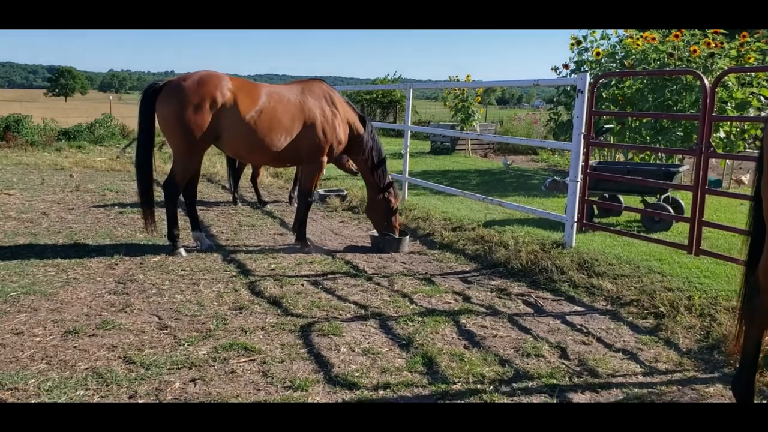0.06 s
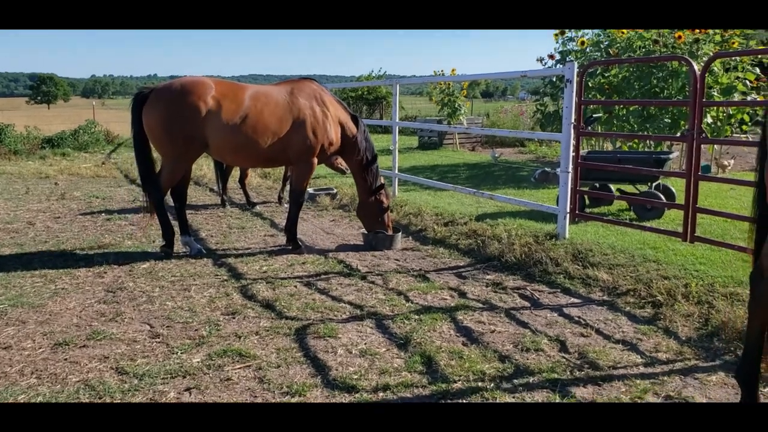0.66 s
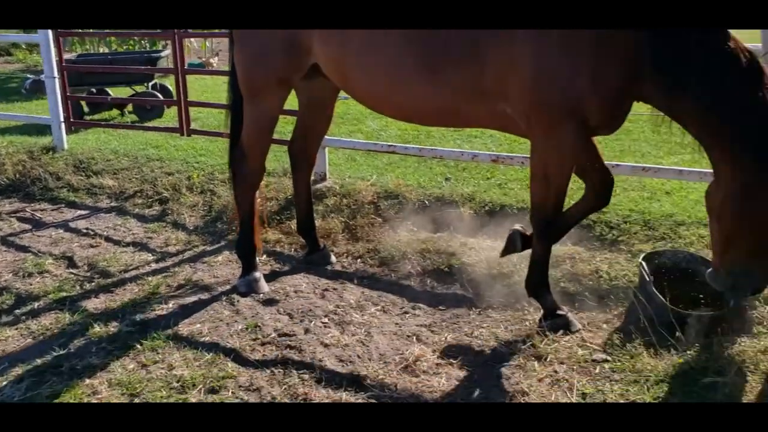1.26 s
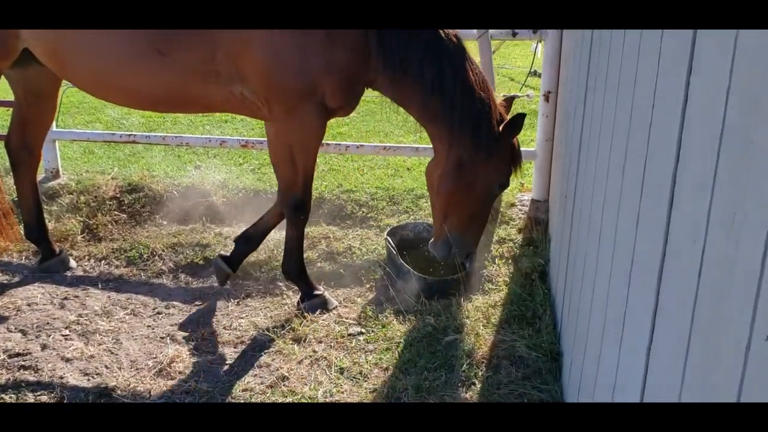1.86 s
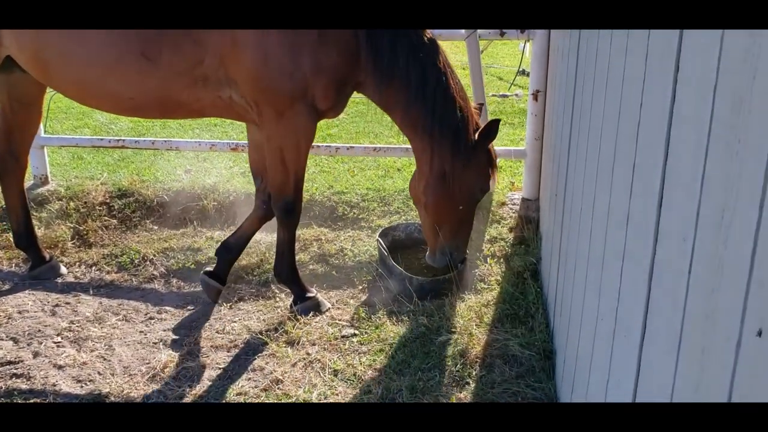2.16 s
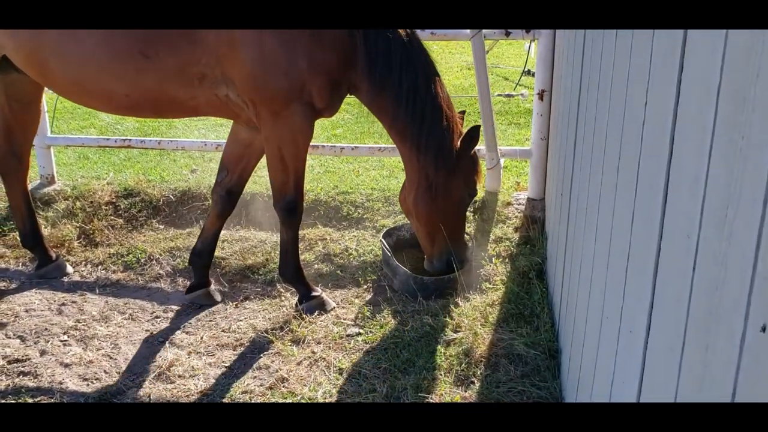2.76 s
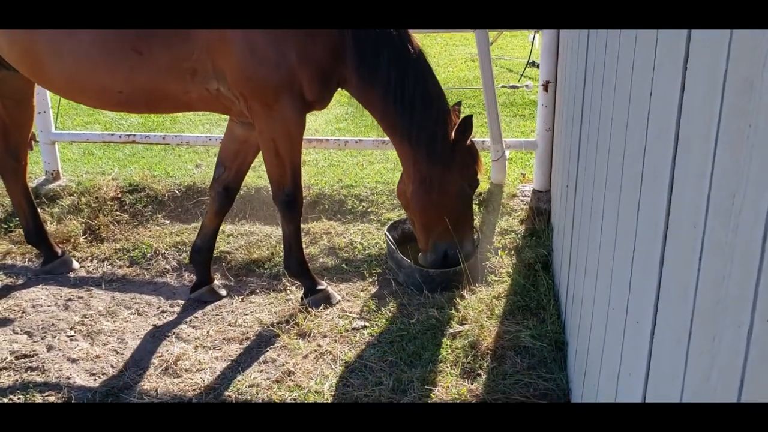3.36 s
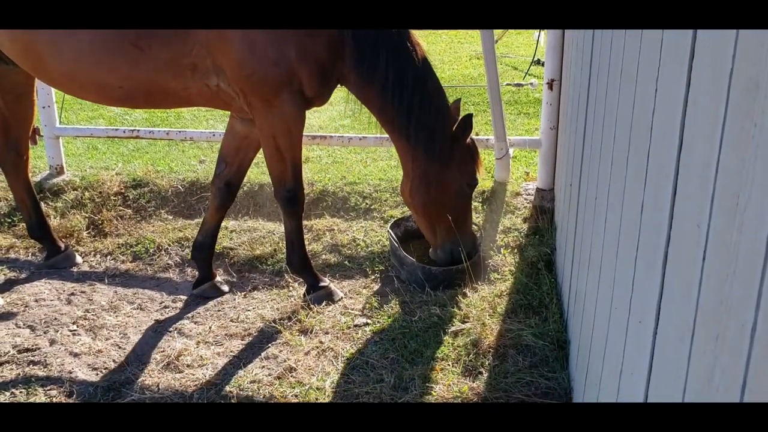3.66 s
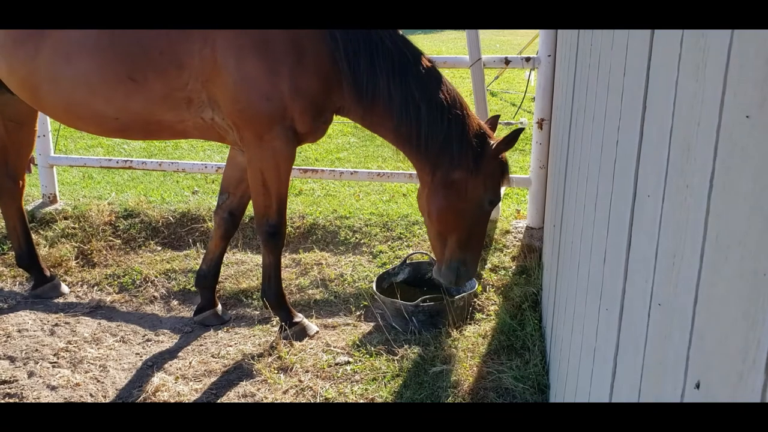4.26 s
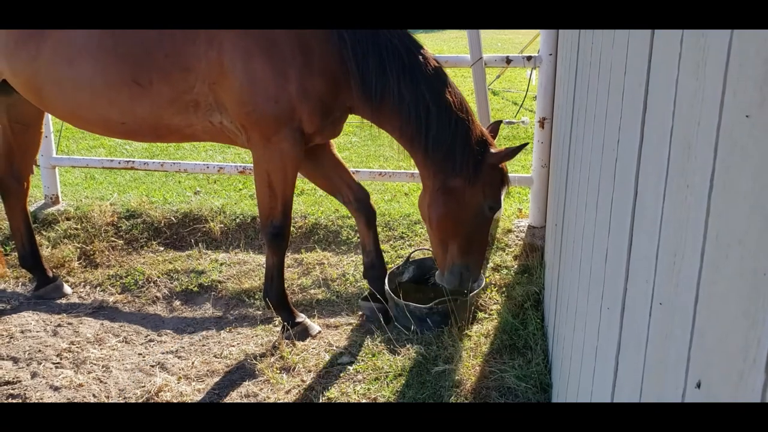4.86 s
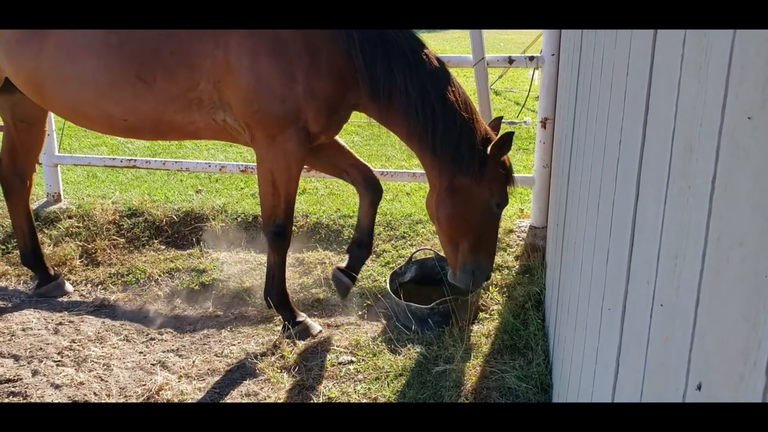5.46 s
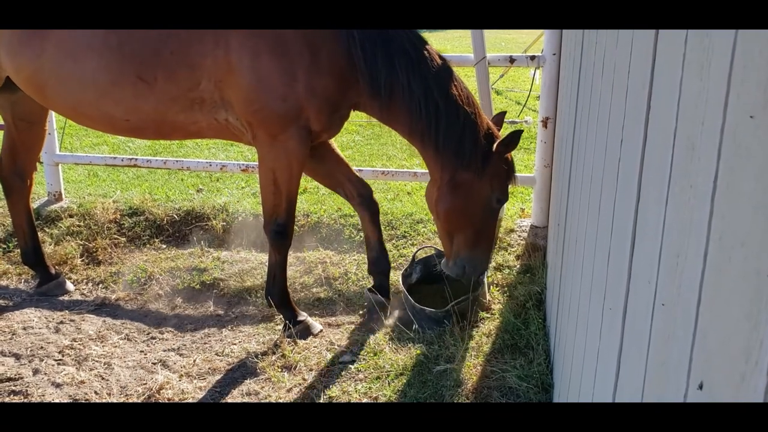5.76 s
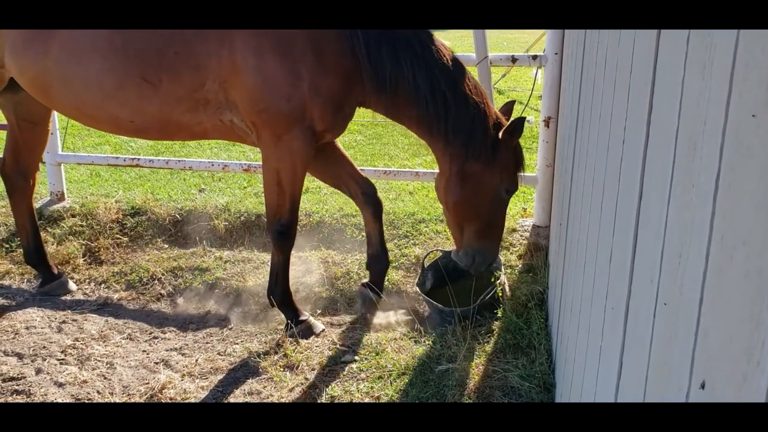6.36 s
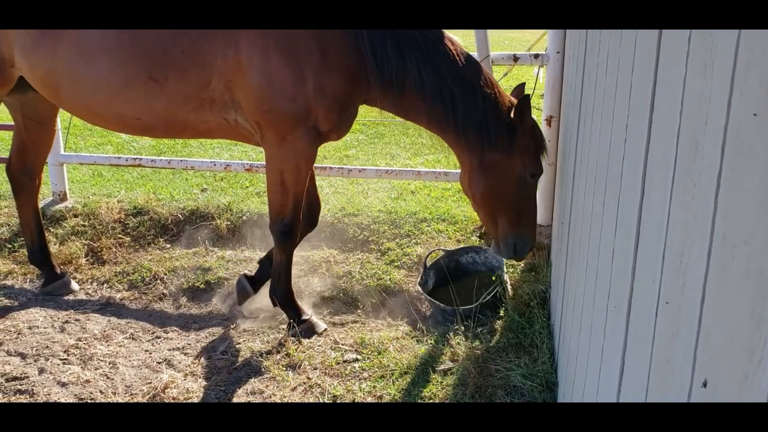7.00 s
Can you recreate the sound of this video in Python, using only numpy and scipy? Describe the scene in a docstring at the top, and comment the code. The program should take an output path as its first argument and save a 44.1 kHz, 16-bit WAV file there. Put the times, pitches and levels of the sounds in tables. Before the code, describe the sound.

Hollow hoof knocks on a rubber tub, dry dirt scrapes and soft thuds as a horse feeds, with one falling chicken squawk.

```python
"""Hollow knocks, cracks and dry scrapes: a horse paws at the low rubber tub it feeds from in a farmyard.
Each hoof blow rings the tub's damped modes; grit snaps and dirt drags in showers of tiny collisions,
and the muzzle bumps about in the feed. A chicken gives one long falling squawk that turns raspy as
its period doubles; another calls far off. Insects sizzle in the grass, something hums, and light wind
rumbles on the microphone. The level dips briefly just before the squawk."""
import sys
import numpy as np
from scipy import signal
from scipy.fft import rfft, irfft, next_fast_len
from scipy.io import wavfile

SR = 44100
rng = np.random.default_rng(int(sys.argv[2]) if len(sys.argv) > 2 else 0)


def digitize_waveform(pressure):
    """Quantize a signal to 16-bit integers and store it at the path in sys.argv[1].

    Rows of a 2-D input are taken as channels; values are limited to [-1, 1].
    """
    field = np.atleast_2d(pressure).T
    bounded = np.clip(field, -1, 1)
    quanta = np.round(bounded * 32767).astype(np.int16)
    wavfile.write(sys.argv[1], SR, quanta)


N = 310023
TIME = np.arange(N) / SR


def from_db(db):
    """Amplitude ratio of a level in decibels."""
    return 10 ** (np.asarray(db) / 20)


def rms_one(x):
    """Normalisation to rms 1."""
    return x / np.sqrt(np.mean(x ** 2) + 1e-20)


def in_time(rows):
    """Linear interpolation of a curve's columns at every sample."""
    times_s, *columns = np.transpose(rows)
    return [np.interp(TIME, times_s, column) for column in columns]


def during(rows, fade_s=0.00595):
    """A gate: 1 while a curve runs, fading to 0 outside it."""
    return np.clip(1 + np.minimum(TIME - rows[0][0], rows[-1][0] - TIME) / fade_s, 0, 1)


def add(track, start_s, sound):
    """Superposition of a sound on a track."""
    start = round(start_s * SR)
    track[..., start:start + sound.shape[-1]] += sound[..., :N - start]


def panned(db):
    """Left and right gains for an interaural level difference."""
    return from_db(db * np.array([[.5], [-.5]]))


def drift(per_s):
    """Random modulation: straight lines between Gaussian values, rms 1."""
    knots = rng.standard_normal(int(N / SR * per_s) + 2)
    return rms_one(np.interp(TIME * per_s, np.arange(len(knots)), knots))


def noise(spectrum, coherence):
    """Spectrally shaped stereo noise with a given left-right coherence, rms 1."""
    hz, db = np.transpose(spectrum)
    size = next_fast_len(N)
    log_hz = np.log(np.arange(size // 2 + 1) * SR / size + 1)
    gain = from_db(np.interp(log_hz, np.log(hz), db, left=-120, right=-120))
    mid, side = irfft(rfft(rng.standard_normal((2, size))) * gain, size)[:, :N]
    return rms_one(np.sqrt(1 + coherence) * mid + np.sqrt(1 - coherence) * side * [[1], [-1]])


def band(hz, half_width_hz, coherence):
    """Noise in a single resonance, 25 dB down at its edges."""
    return noise([(hz - half_width_hz, -25), (hz, 0), (hz + half_width_hz, -25)], coherence)


def decay(t60):
    """A quarter second of exponential damping, 60 dB in t60 seconds."""
    return np.exp(-np.log(1000) * TIME[:SR // 4] / t60)


def swell(t60, contact_s):
    """Impact envelope of height 1: vibration grows during contact, then decays."""
    shape = (1 - np.exp(-(TIME[:SR // 4] / contact_s) ** 2)) * decay(t60)
    return shape / shape.max()


def ring(hz, t60, contact_s, phase_rad=0):
    """One struck mode: a damped sinusoid."""
    return swell(t60, contact_s) * np.sin(2 * np.pi * hz * TIME[:SR // 4] + phase_rad)


def surge(peak_s, rise_s, fade_s):
    """Gaussian rise to height 1, then exponential decay; 20 dB in each span."""
    decades = np.where(TIME < peak_s, ((peak_s - TIME) / rise_s) ** 2, (TIME - peak_s) / fade_s)
    return 10 ** -np.minimum(decades, 10)


def grains(per_s, spread_db, t60):
    """Shot-noise envelope, rms 1: the energies of tiny random collisions add and decay."""
    hits = rng.random(N) < per_s / SR
    power = hits * from_db(spread_db * np.minimum(rng.exponential(1, N), 5)) ** 2
    retained = from_db(-120 / (t60 * SR))
    return rms_one(np.sqrt(signal.lfilter([1], [1, -retained], power + 1e-18)))


def crumbling(spectrum, split_hz, per_s, spread_db, t60, coherence):
    """Granular noise: coarse and fine grains collide independently, below and above a split."""
    whole = noise(spectrum, coherence)
    coarse = signal.sosfiltfilt(signal.butter(2, split_hz, fs=SR, output="sos"), whole)
    return coarse * grains(per_s, spread_db, t60) + (whole - coarse) * grains(per_s, spread_db, t60)


# strength of the wind: time_s, level_db
WIND_LEVEL = [(0, -39), (.25, -46.5), (.95, -47), (1.15, -37), (1.6, -46.5), (2.3, -50.5), (3.1, -54.5),
              (4.4, -59.5), (4.62, -40), (5.05, -42.5), (5.55, -49.5), (6.25, -45.5), (6.6, -52.5),
              (7.03, -49.5)]
# its rumble: frequency_hz, level_db
WIND_SPECTRUM = [(15, -33.5), (25, -19.5), (38, -5.5), (56, 1.5), (80, -1.5), (125, -5), (165, -13.5),
                 (230, -37.5)]

def wind(gust_db=3, gusts_per_s=14):
    """Turbulence buffets the microphone ports, almost independently on each side."""
    rumble = noise(WIND_SPECTRUM, coherence=-.05)
    return from_db(in_time(WIND_LEVEL)[0] + gust_db * drift(gusts_per_s)) * rumble


# strength of the still air's hiss: time_s, level_db
AIR_LEVEL = [(0, -66.5), (2.8, -68), (4.2, -68.5), (4.3, -63), (5.5, -64), (7.03, -70)]
# its colour: frequency_hz, level_db
AIR_SPECTRUM = [(290, -37), (500, -6), (698, -3), (1000, -11.5), (1340, -11), (1510, -17), (2130, -18.5),
                (2330, -19), (2730, -19.5), (8090, -28.5), (10100, -7), (11800, -17), (16000, -12)]

def still_air():
    """Diffuse ambient noise, nearly incoherent between the ears."""
    return from_db(in_time(AIR_LEVEL)[0]) * noise(AIR_SPECTRUM, coherence=0.0993)


def hum(level_db=-62.5, pitch_hz=237):
    """Narrowband noise, heard as a low, wavering tone."""
    return from_db(level_db) * band(pitch_hz, half_width_hz=6, coherence=0.97)


# insects in the grass: pitch_hz, chirps_per_s, level_db
INSECT_BUZZES = [(9600, 3.3, -71.5), (10350, 8.3, -68.5), (10850, 5, -75)]

def insects(pace_spread=0.18):
    """Amplitude modulation: each of three insects pulses a high band of noise at its own pace."""
    out = 0
    for hz, chirps_per_s, db in INSECT_BUZZES:
        cycles = rng.random() + np.cumsum(chirps_per_s * (1 + pace_spread * drift(2.7))) / SR
        chirps = np.sin(np.pi * cycles) ** 16
        out = out + from_db(db) * chirps * band(hz, half_width_hz=500, coherence=0.42)
    return out


def voice(pitch_hz, partials, jitter, flutter_db, throat_hz, throat_width_hz, throat_db, lag_s):
    """Source and filter: a jittering syrinx drives a throat resonance; the right ear hears it later."""
    voiced = pitch_hz > 0
    hz = (pitch_hz * (1 + jitter * drift(350)))[voiced]
    cycles = np.cumsum(hz) / SR - np.array([[0], [lag_s]]) * hz
    out = np.zeros((2, N))
    for multiple, gain in partials:
        detuning = (multiple * hz - throat_hz) * 2 / throat_width_hz
        db = throat_db / (1 + detuning ** 2) + flutter_db * drift(120)[voiced]
        out[:, voiced] += np.sqrt(2) * gain[voiced] * from_db(db) * np.sin(2 * np.pi * multiple * cycles)
    return out


# course of the far chicken's call: time_s, pitch_hz, level_db
FAR_CONTOUR = [(6.71, 539, -91), (6.745, 539.5, -70.5), (6.86, 595, -81), (6.92, 630, -66),
               (7.03, 614, -69)]
# its harmonics: pitch_multiple, level_db
FAR_PARTIALS = [(1, 4.5), (2, -4), (3, -20), (4, -17)]

def far_chicken():
    """Strong pitch jitter makes a distant chicken's call hoarse."""
    pitch_hz, db = in_time(FAR_CONTOUR)
    level = from_db(db) * during(FAR_CONTOUR)
    partials = [(multiple, from_db(partial_db) * level) for multiple, partial_db in FAR_PARTIALS]
    return voice(pitch_hz * (level > 0), partials, jitter=0.04, flutter_db=2.5,
                 throat_hz=1080, throat_width_hz=150, throat_db=14, lag_s=.0001)


# faint calls across the yard: peak_s, length_s, pitch_hz, half_width_hz, level_db
FAINT_CALLS = [(2.014, 0.05, 796, 520, -54.5), (2.65, .37, 764, 402, -69.5), (3.351, 0.091, 2830, 900, -78),
               (3.496, .18, 2140, 300, -75), (6.015, .32, 1157, 499, -64)]

def far_animals():
    """Blurred animal calls: bands of noise under Gaussian envelopes."""
    out = 0
    for peak_s, length_s, hz, half_width_hz, db in FAINT_CALLS:
        envelope = np.exp(-(2 * (TIME - peak_s) / length_s) ** 2)
        out = out + from_db(db) * envelope * band(hz, half_width_hz, coherence=0.73)
    return out


# harmonics of the clear squawk: pitch_multiple, level_db
CLEAR_PARTIALS = [(1, -11), (2, -1), (3, -7), (4, -17), (5, -28), (8, -31.5), (9, -21), (10, -30),
                  (11, -22), (13, -29), (15, -25), (16, -25), (17, -28)]
# the same voice with its period doubled: pitch_multiple, level_db
RASPY_PARTIALS = [(1, -17), (1.5, -11), (2, -0.5), (2.5, -18), (3, -2.5), (3.5, -1.5), (4, 5),
                  (10.5, -21.5), (11, -13)]

def squawk(start_s=4.26, end_s=5.5, attack_s=0.026, release_s=.1, rasp_at_s=5.01, rasp_onset_s=0.12):
    """Period doubling: as a chicken's breath runs out, pitch and level sink and the voice rasps."""
    start_hz, start_db = 812.6, -44.5
    sag_hz, sag_db, waver_hz, waver_db = 169.1, 17, 4, 3   # reached after one second
    age_s = np.maximum(TIME - start_s, 0)
    spent, fatigue = age_s ** 1.55, np.sqrt(age_s)
    gate = np.clip(np.minimum(age_s / attack_s, (end_s - TIME) / release_s), 0, 1)
    level = from_db(start_db - sag_db * spent + waver_db * fatigue * drift(per_s=26)) * gate
    pitch_hz = start_hz - sag_hz * spent + waver_hz * fatigue * drift(per_s=26)
    rasp = .5 + .5 * np.tanh((TIME - rasp_at_s) / rasp_onset_s)
    clear = [(multiple, from_db(db) * level * (1 - rasp)) for multiple, db in CLEAR_PARTIALS]
    raspy = [(multiple, from_db(db) * level * rasp) for multiple, db in RASPY_PARTIALS]
    call = voice(pitch_hz * (level > 0), clear + raspy, jitter=0.0024 + 0.0115 * rasp, flutter_db=2.04,
                 throat_hz=2122, throat_width_hz=256, throat_db=14.5, lag_s=0.00016)
    return panned(db=4) * call


# how busily the muzzle works in the feed: time_s, level_db
RUMMAGE_LEVEL = [(0, -48.5), (.35, -46.5), (1.5, -45.5), (2.2, -53.5), (3, -56), (3.5, -53), (4.22, -54.5),
                 (4.38, -68), (4.58, -49), (4.9, -48), (5.15, -63.5), (5.8, -56), (7.03, -62)]
# feed shoved about in the tub: frequency_hz, level_db
RUMMAGE_SPECTRUM = [(53, -44), (90, -11), (167, -1.5), (241, -8), (259, -12), (297, -11.5), (492, -29),
                    (700, -36.5), (910, -63), (1540, -120)]
# the lips gather a mouthful: peak_s, level_db
MOUTHFUL_RUSTLES = [(3.11, -75.5), (3.35, -70.5), (4.02, -72.5)]
# dry crumbs, of feed or of dirt: frequency_hz, level_db
CRUMB_SPECTRUM = [(470, -30), (800, -1.5), (1130, -2), (2180, -6.5), (2750, -4), (3100, -5), (4830, -13.5),
                  (5500, -10), (7150, -34), (12100, -120)]

def feeding(nuzzle_db=2, nuzzles_per_s=15, crunch_db=-34.5):
    """Friction noise: the lips push the feed and let go; bits crunch and each mouthful rustles."""
    effort = from_db(in_time(RUMMAGE_LEVEL)[0] + nuzzle_db * drift(nuzzles_per_s))
    crunches = effort * from_db(crunch_db) * grains(per_s=45, spread_db=1.0, t60=.09)
    rustles = sum(from_db(db) * surge(s, rise_s=0.046, fade_s=0.12) for s, db in MOUTHFUL_RUSTLES)
    rummage = effort * noise(RUMMAGE_SPECTRUM, coherence=0.84)
    return rummage + (crunches + rustles) * noise(CRUMB_SPECTRUM, coherence=.6)


# soft blows of hoof and muzzle: start_s, level_db, pitch_hz
SOFT_BLOWS = [(0.056, -28, 72), (.503, -37, 96), (.89, -34.5, 148), (1.059, -38, 159), (1.129, -28.5, 88),
              (1.21, -31, 137), (1.292, -30, 145), (1.69, -38, 102), (2.198, -37, 123.6), (3.389, -40, 185),
              (4.513, -31.5, 111), (4.621, -30, 84.6), (4.649, -25, 62.4), (5.358, -30.5, 65),
              (5.64, -31.5, 159), (5.952, -37, 110), (6.796, -36.5, 118)]

def thuds(t60=0.086, contact_s=0.0054):
    """Heavy damping: soft ground and feed absorb a blow in a few slow cycles."""
    out = np.zeros(N)
    for start_s, db, hz in SOFT_BLOWS:
        add(out, start_s, from_db(db) * ring(hz, t60, contact_s))
    return out


# spectra of snapping stone and of fine sand: frequency_hz, level_db
STONE_SPECTRUM = [(600, -10), (1500, -7.5), (2500, -4), (5000, 1.5), (8500, -1.5), (12000, -2),
                  (16500, -5.5)]
SAND_SPECTRUM = [(3000, -24), (7000, -6.5), (8500, -13), (11000, 2), (14000, -1.5), (16500, -1)]
# grit crushed under the hoof: start_s, level_db, sand_share
GRIT_CRACKS = [(.271, -32, 0), (.461, -34.5, 1), (0.57, -45, 0.93), (0.7675, -15.5, .25), (.784, -34.5, .4),
               (.908, -44, 1), (1.5424, -17, .62), (1.548, -41, 0.5), (1.622, -39, .05), (2.1993, -39, .2),
               (4.924, -41, .4), (4.944, -39.5, .05), (5.068, -35.5, 0.9), (5.19, -31.5, 0.84),
               (5.5768, -20, 0.66), (5.796, -40, 0.66), (5.814, -34.5, .4), (6.059, -40, 1),
               (6.16, -45, 0.84), (6.1896, -19, 0.82), (6.28, -28, 0.56), (6.3062, -20.5, .2),
               (6.548, -39.5, 0.77), (6.62, -44, 1), (6.795, -45, 0.5), (6.844, -42, 0)]

def cracks(toe_db=-4, toe_t60=0.0022, heel_delay_s=0.0024, heel_db=-6):
    """Brittle fracture: grit snaps under the toe, crumbles, and bursts again as the heel follows."""
    crush = np.zeros((2, N))
    for start_s, db, sand_share in GRIT_CRACKS:
        t60 = 0.023 * .5 ** ((db + 19.5) / 21)   # halves for every 21 dB of added strength
        height = from_db(db) * np.sqrt([[1 - sand_share], [sand_share]])
        add(crush, start_s, height * (decay(t60) + from_db(toe_db) * decay(toe_t60)))
        add(crush, start_s + heel_delay_s, height * from_db(heel_db) * decay(t60 / 2))
    stone = crush[0] * noise(STONE_SPECTRUM, coherence=0.44)
    sand = crush[1] * noise(SAND_SPECTRUM, coherence=.2)
    return (stone + sand) * grains(per_s=9000, spread_db=2, t60=0.0019)


# spectra of rolling grit and of the rubbed tub: frequency_hz, level_db
GRIT_SPECTRUM = [(2060, -37), (3500, -7), (5000, -5.5), (5860, -8.5), (6780, -0.5), (8530, -9), (9620, -5),
                 (15000, 0.5), (16000, -11)]
RUB_SPECTRUM = [(120, -32), (200, -6), (318, -9.5), (373, -7.5), (477, -5), (593, 1), (958, -17),
                (1040, -13), (1200, -10.5), (1560, -41), (2640, -120)]
# the hoof drags through dirt: peak_s, level_db, rise_s, fade_s, relative_rub_db
HOOF_DRAGS = [(.33, -42.5, 0.09, 0.0947, -5), (0.424, -40.5, 0.11, 0.16, -10.5),
              (0.766, -46, 0.045, .05, -1), (.812, -39, 0.0531, .045, -1), (.91, -53, 0.08, .12, 5),
              (1.02, -51, .07, 0.06, -5), (1.069, -39, .055, 0.11, 1), (1.558, -38, -0.01, 0.0656, 1),
              (1.64, -50.5, 0.02, 0.15, 8.5), (2.205, -50.5, -0.0155, .05, -13),
              (4.787, -42, 0.0225, 0.1158, 0), (4.865, -43, 0.1157, 0.0838, -0.5),
              (4.94, -46.5, 0.0735, 0.16, -3), (5.595, -37, 0.0383, 0.1971, 1.5),
              (5.825, -44.5, 0.1, 0.09, -3), (6.215, -39.5, 0.0374, 0.28, 0.5),
              (6.35, -38, 0.1278, .14, -2), (6.537, -49, 0.04, .04, -6), (6.83, -57.5, 0.05, 0.15, 2)]
# sand flung from the swinging hoof: peak_s, level_db
SAND_SPRAYS = [(.65, -46), (.738, -48.5), (4.48, -58.5), (4.68, -59.5), (5.13, -51), (5.199, -45.5),
               (6.01, -49), (6.085, -45), (6.58, -48), (6.71, -51.5), (6.85, -57), (6.99, -56.5)]

def scrapes(dirt_db=-3, pebble_db=-12, settle_db=-17.5, settle_s=.45):
    """Sliding friction: the hoof rolls grit, ploughs dirt and judders on the tub; sand falls after."""
    pressure, rub, sand = np.zeros((3, N))
    for peak_s, db, rise_s, fade_s, rub_db in HOOF_DRAGS:
        drag = from_db(db) * surge(peak_s, rise_s, fade_s)
        pressure = np.maximum(pressure, drag)
        rub = np.maximum(rub, from_db(rub_db) * drag)
        sand = np.maximum(sand, from_db(db + settle_db) * surge(peak_s, rise_s, settle_s))
    for peak_s, db in SAND_SPRAYS:
        sand = np.maximum(sand, from_db(db) * surge(peak_s, rise_s=0.063, fade_s=0.14))
    grit = crumbling(GRIT_SPECTRUM, split_hz=8500, per_s=1800, spread_db=2.5, t60=0.0062, coherence=0.3)
    trickle = crumbling(SAND_SPECTRUM, split_hz=9000, per_s=1800, spread_db=2, t60=0.007, coherence=.3)
    dirt = crumbling(CRUMB_SPECTRUM, split_hz=2050, per_s=960, spread_db=1, t60=0.01, coherence=0.14)
    pebbles = grains(per_s=75, spread_db=3, t60=0.0066) * noise(STONE_SPECTRUM, coherence=0.45)
    judder = rub * grains(per_s=250, spread_db=-0.5, t60=0.032) * noise(RUB_SPECTRUM, coherence=0.75)
    ground = pressure * (grit + from_db(dirt_db) * dirt + from_db(pebble_db) * pebbles)
    return ground + sand * trickle, judder


# modes of the rubber tub: frequency_hz, level_db, t60_s
TUB_MODES = [(165.2, -6, 0.044), (223.6, -0.5, 0.1), (285, -5, 0.091), (325, 2.5, 0.051),
             (410, -5.5, 0.018), (553, -4.5, 0.046), (674.4, -3, 0.054), (744.5, -13, 0.059)]
# clack of its stiff rim: frequency_hz, level_db
RIM_SPECTRUM = [(800, -14), (1100, -1.5), (1500, -0.5), (1800, -7.5), (2150, -1.5), (2700, -14.5),
                (3800, -15), (4800, -32), (9000, -37)]
# the hoof strikes a part of the tub: start_s, level_db, pitch_hz, hardness_db
HOOF_BLOWS = [(.238, -31.5, 590, -27.5), (.271, -23, 274, -20), (.281, -16.5, 294, -24),
              (0.362, -25, 364, -21), (.419, -23.5, 350, -8.5), (.715, -30.5, 231, -25),
              (.753, -18, 336, -17), (.771, -15.5, 336, -6.5), (.808, -23.5, 348, -7),
              (1.062, -32, 400, -16), (1.15, -32, 330, -24), (1.509, -19, 557, -26.5),
              (1.5423, -12, 350, -21), (1.621, -19, 447, -14), (1.634, -22.5, 504, -6),
              (4.765, -10, 680, -4), (5.576, -10.5, 614, -21), (5.626, -29, 413, 1.5),
              (5.648, -25.5, 245, -3), (5.673, -22.5, 560, -12), (6.19, -28.5, 745, -8),
              (6.227, -28.5, 706, 0.5), (6.248, -25, 237, -6)]

def knocks(falloff_db_per_octave=15, rim_db=-11, rim_t60=0.037, ear_phase_rad=0.27):
    """Modal vibration: a blow excites mostly the modes of the part struck; hard ones clack the rim."""
    walls, rim = np.zeros((2, N)), np.zeros(N)
    for start_s, db, struck_hz, hardness_db in HOOF_BLOWS:
        contact_s = 5e-6 * struck_hz   # higher-pitched parts of the wall yield for longer
        wall = 0
        for hz, mode_db, t60 in TUB_MODES:
            octaves_away = abs(np.log2(hz / struck_hz))
            strength = from_db(mode_db - falloff_db_per_octave * octaves_away + rng.normal(0, 0.71))
            shifted_hz = hz * rng.normal(1, .02)   # the soft tub deforms from blow to blow
            wall = wall + strength * ring(shifted_hz, t60, contact_s, rng.normal(0, ear_phase_rad, (2, 1)))
        add(walls, start_s, from_db(db) * wall / abs(wall).max())
        add(rim, start_s, from_db(db + hardness_db + rim_db) * swell(rim_t60, contact_s))
    return walls + rim * noise(RIM_SPECTRUM, coherence=0.65)


def off_axis(x, shade_db=-4.5, above_hz=8970, facing_s=1.7):
    """Directivity: the treble is shaded until the microphone has turned to face the horse."""
    treble = signal.sosfiltfilt(signal.butter(2, above_hz, "high", fs=SR, output="sos"), x)
    aside = np.clip(2 * (facing_s - TIME), 0, 1)
    return x + (from_db(shade_db * aside) - 1) * treble


def yard(x, t60, cutoff_hz):
    """Reverberation: scattered echoes from shed, fence and ground, different at each ear."""
    t = TIME[:SR // 2]
    tail = rng.standard_normal((2, len(t))) * from_db(-60 * t / t60) * (t > .006)
    tail /= np.sqrt(np.sum(tail[0] ** 2))
    dulled = signal.sosfilt(signal.butter(1, cutoff_hz, fs=SR, output="sos"), tail)
    return signal.fftconvolve(x, dulled, axes=1)[:, :N]


# where the hoof meets the ground: time_s, left_minus_right_db
HOOF_POSITION = [(.3, 0), (.77, -2.5), (1.55, -4.5), (2.2, -1.5), (4.8, 5), (7, 0)]

def scene(hoof_echo_db=-21, animal_echo_db=-13, dip_s=4.251, dip_length_s=0.038, dip_db=-30):
    """Superposition of the near horse, farther animals, echoes and background; the sum dips once."""
    scraping, judder = scrapes()
    tub = knocks() + judder
    hoof = tub + (cracks() + off_axis(scraping)) * panned(in_time(HOOF_POSITION)[0])
    animals = squawk() + far_chicken() + far_animals()
    echoes = from_db(hoof_echo_db) * yard(hoof, t60=0.64, cutoff_hz=5240)
    echoes += from_db(animal_echo_db) * yard(animals, t60=0.28, cutoff_hz=6000)
    horse = hoof + thuds() + feeding()
    background = wind() + still_air() + hum() + insects()
    dip = from_db(dip_db * np.exp(-(2 * (TIME - dip_s) / dip_length_s) ** 2))
    return (background + echoes + animals + horse) * dip


def record(dry, cutoff_hz=16000):
    """Band limiting: a steep elliptic low-pass removes the highest treble."""
    return signal.sosfilt(signal.ellip(10, .2, 80, cutoff_hz, fs=SR, output="sos"), dry)


dry = scene()
out = record(dry)
digitize_waveform(out)
```